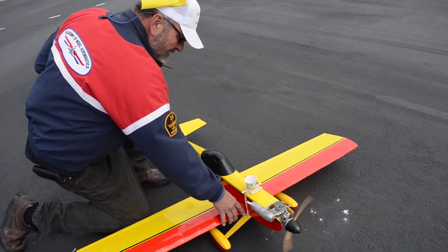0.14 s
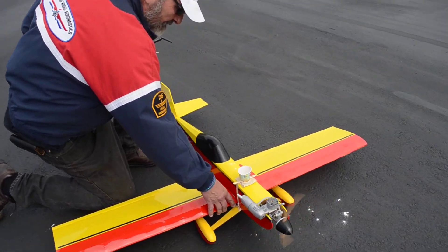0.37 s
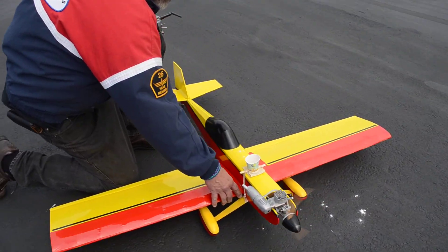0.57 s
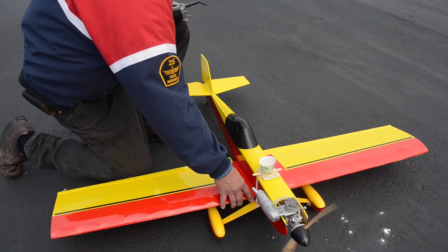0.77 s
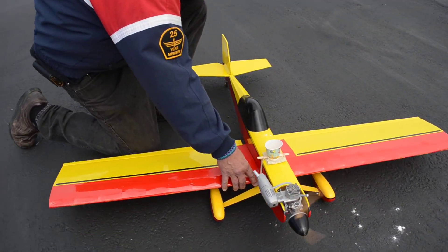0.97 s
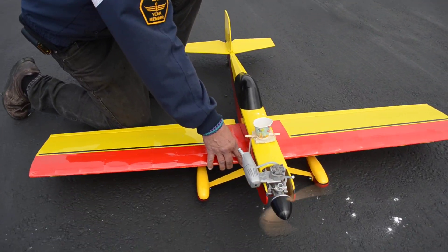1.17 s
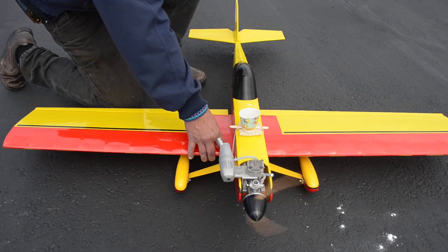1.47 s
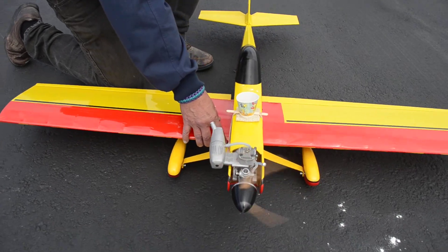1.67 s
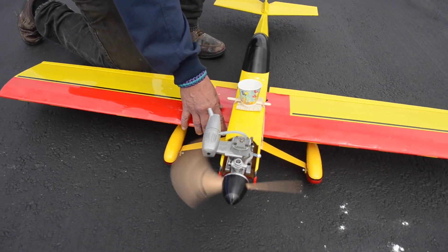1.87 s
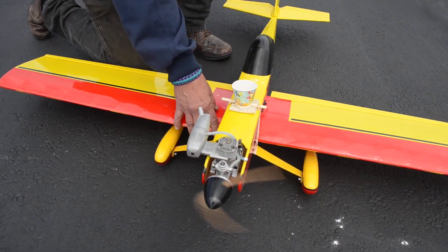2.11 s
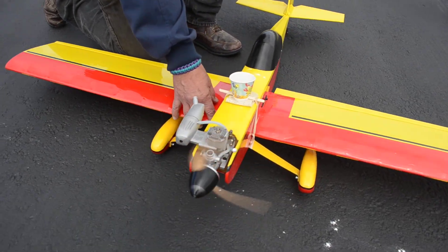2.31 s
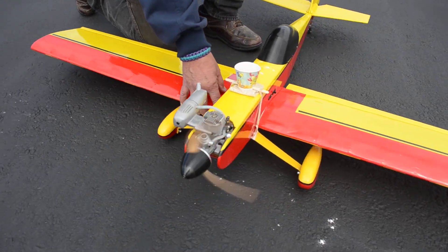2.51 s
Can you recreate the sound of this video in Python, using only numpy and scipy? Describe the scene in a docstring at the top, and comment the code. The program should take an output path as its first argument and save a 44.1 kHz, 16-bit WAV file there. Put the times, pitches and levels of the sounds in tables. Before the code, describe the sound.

A small single-cylinder model airplane engine putters at about 45 pops a second outdoors, close up. Until 0.8 s, propeller wash buffets the microphone with low rumble, thuds and slaps, half burying dull pops. From 1.0 s it speeds up, peaking near 1.2 s, with another gust and a crack around 1.3-1.4 s. By 1.8 s it settles into a clear, uneven idle with metallic knocks, propeller rush and faint hiss.

```python
"""A model airplane's single-cylinder engine idles on an airfield, picks up briefly and settles again.
At first the microphone is in the slipstream: shaped noise rumbles and buffets, with slaps, thuds and cracks.
Under it the exhaust pops once a turn, hard or faint, as short ringing sine bursts, and the metal knocks.
As the engine picks up, the microphone comes round to the nose: the pops, the knocks and the propeller's
rush of noise grow clear and bright. A soft intake hiss and a faint steady whine run throughout."""
import sys
import numpy as np
from scipy import signal
from scipy.fft import rfft, irfft
from scipy.io import wavfile
from scipy.ndimage import uniform_filter1d, minimum_filter1d

SR = 44100
rng = np.random.default_rng(int(sys.argv[2]) if len(sys.argv) > 2 else 0)


def wav_record(signal):
    """Record a signal, one row per channel, as 16-bit PCM in the file named by sys.argv[1]."""
    frames = np.transpose(np.atleast_2d(signal))
    bounded = np.clip(frames, -1, 1)
    # unit amplitude maps onto the largest positive 16-bit level
    quanta = np.round(bounded * 32767).astype(np.int16)
    wavfile.write(sys.argv[1], SR, quanta)


N = 116865
TIME = np.arange(N) / SR  # seconds

# Colour tables give only the shape of a noise's spectrum; the noise is then scaled to an rms of one.

# Crankshaft speed: time_s, speed_turns_per_s
SHAFT_SPEED = [(0.0, 44.56), (0.3, 43.04), (0.75, 41.91), (0.92, 44.51), (1.02, 49.27), (1.1, 63.05),
               (1.22, 75.11), (1.33, 64.9), (1.48, 61.16), (1.6, 51.78), (1.78, 46.26), (2.1, 45.26),
               (2.4, 47.05), (2.65, 48.97)]
# How far the microphone has come round from the side to the front: time_s, front_share (0 to 1)
FRONT_SHARE = [(.85, 0.2), (1.5, 0.94)]

# Low rumble of the wind, level: time_s, level_db
RUMBLE_LEVEL = [(0, -26), (.2, -29), (.6, -22.5), (.75, -31.5), (.9, -21.5), (1.04, -19.5), (1.13, -38),
                (1.23, -15), (1.31, -25.5), (1.5, -25), (1.65, -25.5), (1.77, -38), (1.87, -26),
                (1.95, -35), (2.65, -34.5)]
# Low rumble of the wind, colour: pitch_hz, level_db
RUMBLE_COLOUR = [(15, -38.5), (35, -19), (60, 2), (110, 2.5), (170, 0.5), (300, -17.5), (1000, -86.5)]
# Buffeting of the slipstream, level: time_s, level_db
BUFFET_LEVEL = [(0, -12.5), (.1, -17), (.22, -16), (.36, -16), (.5, -14.5), (.57, -15), (.598, -24.5),
                (.615, -15.5), (.69, -17), (.74, -21), (.8, -21.5), (.87, -25.5), (1.02, -34.5),
                (1.17, -23.5), (1.26, -27), (1.31, -19), (1.38, -18), (1.43, -25.5), (1.56, -28.5),
                (1.7, -33), (2.65, -33)]
# Buffeting of the slipstream, colour: pitch_hz, level_db
BUFFET_COLOUR = [(15, -38), (40, -23.5), (110, -6), (160, 0.5), (215, -0.5), (290, -4), (400, -2),
                 (600, -10), (900, -22.5), (1400, -52), (2500, -71.5), (6000, -78)]
# Rough upper edge of the buffeting, colour: pitch_hz, level_db
EDGE_COLOUR = [(200, -24), (500, 7.5), (900, -3.5), (1200, -4), (1450, -21), (1900, -21), (2500, -30.5),
               (3200, -34.5), (6000, -64.5)]
RUMBLE_LUMP_DB, BUFFET_LUMP_DB, EDGE_LUMP_DB = 1, 1.5, 4
EDGE_FOLLOW_DB = -9  # the rough edge against the buffeting

# Propeller rush, level: time_s, level_db
RUSH_LEVEL = [(0, -43.5), (.8, -54.5), (.95, -31), (1.1, -27.5), (1.22, -21.5), (1.33, -30), (1.6, -26.5),
              (1.8, -27.5), (2.2, -27.5), (2.65, -26.5)]
# Propeller rush, colour: pitch_hz, level_db
RUSH_COLOUR = [(40, 1), (100, -11.5), (200, 9.5), (280, -10), (450, 0.5), (700, 3.5), (1050, 3),
               (1500, -2.5), (2100, -17), (3000, -18), (6000, -63), (16000, -77)]
# Propeller hiss, level: time_s, level_db
HISS_LEVEL = [(0, -53), (.72, -59), (.88, -46.5), (1, -42.5), (1.13, -32), (1.22, -31), (1.29, -32.5),
              (1.32, -40.5), (1.42, -36.5), (1.65, -37.5), (1.85, -40), (2.3, -38.5), (2.65, -37)]
# Propeller hiss heard from the side, colour: pitch_hz, level_db
HISS_SIDE_COLOUR = [(700, -30.5), (1800, 10), (2900, -6), (3900, -1.5), (6000, -18.5), (12000, -18.5),
                    (16000, -34.5)]
# Propeller hiss heard from the front, colour: pitch_hz, level_db
HISS_FRONT_COLOUR = [(700, -6), (1800, 2.5), (2400, 1), (2650, -3), (2950, -1.5), (3250, -1.5), (3550, -8),
                     (3900, -4.5), (4200, -11), (5100, -14.5), (6000, -17.5), (7500, -19), (9000, -20.5),
                     (12000, -22), (14000, -33), (16000, -33)]
# Propeller hum: multiple_of_shaft_speed, level_against_the_rush_db
HUM_TONES = [(2, -7.5), (4, -6.5), (5, -13)]
SWISH_PHASE = 0.021  # part of a turn at which the rush peaks
RUSH_SWISH, HISS_SWISH = .3, .08  # swell in each turn, as a share of the level
RUSH_LUMP_DB, HISS_LUMP_DB = 1.0, 1.4

# Air drawn through the carburettor, level: time_s, level_db
INTAKE_LEVEL = [(0, -60), (.8, -60.5), (1.2, -50), (1.6, -47.5), (2.65, -43.5)]
# Air drawn through the carburettor, colour: pitch_hz, level_db
INTAKE_COLOUR = [(3000, -26.5), (4100, -23.5), (4450, 7.5), (4750, -16.5), (5100, 0.5), (5600, -17),
                 (8000, -36), (16000, -67.5)]
INTAKE_OPENS, INTAKE_RISE, INTAKE_FADE = .57, 0.048, 0.32  # in turns
WHINE_HZ, WHINE_DB = 15672, -82.5

# Ordinary pop, before the scatter and the ring's own level: time_s, level_db
POP_LEVEL = [(0, -26), (.8, -23), (.95, -18), (1.15, -13), (1.5, -15), (1.8, -14), (2.1, -12), (2.65, -12)]
# Hard firings: time_s, knock_db (before KNOCK_DB is added), pop_change_db
HARD_FIRINGS = [(.092, -52, 5), (.160, -56, 6), (.206, -43, -7), (.275, -47, 7), (.345, -49, 7),
                (.415, -52, -9), (.486, -53.5, 12), (.602, -47.5, -3), (.768, -49, -2), (.839, -47.5, 4.5),
                (.907, -43, 5), (.952, -44, 6), (.973, -45, 4), (.993, -42.5, 5), (1.034, -37, 5),
                (1.053, -39, 5), (1.088, -42, 3), (1.119, -42, 5.5), (1.149, -38, 4.5), (1.178, -40, 4.5),
                (1.205, -41, 5), (1.233, -42, 5), (1.289, -38, 10), (1.352, -55, 7), (1.396, -42, 3.5),
                (1.445, -41, 2), (1.493, -42, 3), (1.639, -52, 4), (1.659, -37.5, 4.5), (1.720, -38.5, 6),
                (1.807, -35, 5), (1.871, -43, -5), (1.893, -39.5, 3.5), (1.980, -36, 5.5),
                (2.046, -40, 0.5), (2.112, -50, 1), (2.134, -42, 0.5), (2.156, -40, 0.5), (2.199, -39, 1),
                (2.244, -34.5, 0.5), (2.286, -41.5, 2.5), (2.331, -38, 1.5), (2.436, -30.5, 4),
                (2.499, -38, 0.5), (2.520, -37.5, -1), (2.583, -39, 2), (2.602, -40.5, 1.5)]
# Misfires, whose pops are faint: time_s
MISFIRE_TIMES = [.883, 1.013, 1.134, 1.163, 1.247, 1.274, 1.319, 1.334, 1.365, 1.428, 1.460, 1.477, 1.562,
                 1.620, 1.679, 1.740, 1.784, 1.828, 2.002, 2.178, 2.265, 2.458, 2.479, 2.541, 2.622]
# Rings of the muffler: pitch_hz (before detuning), level_db, hold_s, decay_s, side_db
# (side_db counts times 1.5 minus the front share)
MUFFLER_RINGS = [(880, -3.5, .0025, .0002, 0), (997, -8, .0009, .0006, -2), (1111, -17, .0019, .0033, 3),
                 (1900, -21, .001, .0015, -16), (160, -26, .01, .005, 0)]
MISFIRE_DB, POP_SCATTER_DB = -13.5, .3
POP_DETUNE = .025  # typical random pitch change, as a share
POP_RISE_S, POP_LAG_S = .0003, .0008

# Sudden slaps of air on the microphone: start_s, level_db
SLAP_EVENTS = [(.001, -15.5), (.027, -16), (.052, -23.5), (0.086, -26), (0.114, -23), (.151, -16),
               (0.167, -20), (.190, -25.5), (0.203, -20.5), (.214, -16), (.233, -16), (.239, -17.5),
               (0.273, -23), (0.294, -19), (0.306, -19.5), (0.435, -14.5), (0.44, -16), (0.453, -14.5),
               (.474, -22), (0.481, -22), (0.494, -19), (0.511, -14.5), (0.522, -19.5), (0.535, -20),
               (0.609, -19), (0.689, -21), (0.71, -18), (1.286, -19), (1.296, -14.5), (1.314, -15),
               (1.35, -22), (1.374, -23), (1.392, -20)]
# Slap, colour: pitch_hz, level_db
SLAP_COLOUR = [(150, -24.5), (550, 2.5), (1000, 2.5), (1500, -9), (2100, -15.5), (3000, -36.5), (6000, -50),
               (16000, -76.5)]
SLAP_RISE_S, SLAP_HOLD_S, SLAP_FALL_S = .0006, .003, .0018

# Soft tick of an ordinary turn: time_s, level_db
TICK_LEVEL = [(0, -72.5), (.8, -67.5), (1.1, -47), (1.5, -66), (2.65, -55)]
# Knock heard from the side, colour: pitch_hz, level_db
KNOCK_SIDE_COLOUR = [(3000, -30), (6900, -25.5), (7400, -8), (7680, 7.5), (8000, -11), (8500, -30.5),
                     (11000, -14), (16000, -33)]
# Knock heard from the front, colour: pitch_hz, level_db
KNOCK_FRONT_COLOUR = [(3000, -12), (6000, -18), (6700, 0), (7100, -8.5), (7700, -4.5), (9200, -11),
                      (11500, -7.5), (16000, -31)]
# Rings of the engine's metal, scaled by the front share: pitch_hz, level_against_the_knock_db, decay_s
METAL_RINGS = [(6700, -12, .012), (10410, -20, .012)]
KNOCK_LAG_S, KNOCK_RISE_S, KNOCK_DECAY_S, KNOCK_DB = 0.0014, 0.00027, 0.0041, -3.5
SNAP_S, SNAP_DB = .0005, -5  # hold and decay of the snap; its level against the rattle

# Large eddies that thud on the microphone: middle_s, pitch_hz (halfway through the sag), level_db
EDDY_EVENTS = [(0.012, 230, -10.5), (0.044, 111, -16.5), (0.102, 194, -4), (0.166, 195, -9),
               (.203, 219, -8), (0.245, 196, -4.5), (.376, 353, -5.5), (0.483, 190, -17.5),
               (0.552, 400, -16), (.566, 226, -6.5), (.613, 447, -4.5), (0.628, 215, -8), (0.67, 384, -5.5),
               (0.71, 438, -2), (0.76, 430, -8.5), (.821, 336, -12.5), (.900, 95, -14.5), (1.033, 130, -24),
               (1.237, 95, -16), (1.275, 209, -6.5), (1.304, 343, -3.5), (1.339, 377, -7.5),
               (1.380, 190, -10.5), (1.464, 103, -14), (1.633, 85, -24), (1.848, 112, -25)]
EDDY_CYCLES = 4.16  # length of a thud
EDDY_SAG = 0.57  # whole fall in pitch, as a share of the middle pitch

# Sharp cracks of the microphone in the gusts, before softening: start_s, level_db
CRACK_EVENTS = [(.376, -26), (.454, -34), (.482, -28), (.565, -25), (0.612, -27), (0.712, -24),
                (1.307, -21), (1.4238, -8)]
CRACK_DECAY_S, CRACK_EDGE_HZ = 0.00044, 8900

CEILING = 0.7  # loudest sample value the limiter aims for
FADE_IN_S = .002
CUTOFF_HZ = 15900


def amp(db):
    """Turns decibels into a gain."""
    return 10 ** (np.asarray(db) / 20)


def unit(x):
    """Scales a sound to an rms of one."""
    return x / np.sqrt(np.mean(x ** 2) + 1e-20)


def curve(points, at=TIME):
    """Joins (time, value) points with straight lines and reads them."""
    return np.interp(at, *np.transpose(points))


def add(mix, s, sound):
    """Mixes a sound in at a time in seconds."""
    part = mix[max(round(s * SR), 0):][:len(sound)]
    part += sound[:len(part)]


def noise(colour):
    """Makes steady random noise with the spectrum of a colour table."""
    hz, db = np.transpose(colour)
    bins_hz = np.fft.rfftfreq(N, 1 / SR)
    gain = amp(np.interp(np.log(bins_hz + 1), np.log(hz), db))
    return unit(irfft(rfft(rng.standard_normal(N)) * gain, N))


def lumps(depth_db, rate_hz):
    """Turbulent air swells and fades at random: a gain drawn from slow noise."""
    bins_hz = np.fft.rfftfreq(N, 1 / SR)
    slow = irfft(rfft(rng.standard_normal(N)) * np.exp(-(bins_hz / rate_hz) ** 2), N)
    return unit(amp(depth_db * np.clip(unit(slow), -2, 2)))


def burst(t, rise_s, hold_s, decay_s):
    """An envelope that rises, holds and dies away; hold counts from the start."""
    return np.clip(t / rise_s, 0, 1) * np.exp(-np.maximum(t - hold_s, 0) / decay_s)


def turning(side, front, power):
    """Noise whose colour changes as the microphone comes round to the nose."""
    share = curve(FRONT_SHARE).clip(0, 1) ** power
    # square roots keep the total power steady
    return np.sqrt(1 - share) * noise(side) + np.sqrt(share) * noise(front)


def shaft():
    """Adds up the crankshaft's speed into turns, and finds when each turn begins."""
    turns = np.cumsum(curve(SHAFT_SPEED)) / SR
    firings = np.interp(np.arange(int(turns[-1]) + 1), turns, TIME)
    return turns, firings


def wind():
    """Slipstream and breeze beat on the microphone in lumpy gusts of low noise with a rough edge."""
    force = amp(curve(BUFFET_LEVEL))
    rumble = amp(curve(RUMBLE_LEVEL)) * noise(RUMBLE_COLOUR) * lumps(RUMBLE_LUMP_DB, rate_hz=4.8)
    buffet = force * noise(BUFFET_COLOUR) * lumps(BUFFET_LUMP_DB, rate_hz=86)
    edge = amp(EDGE_FOLLOW_DB) * force * noise(EDGE_COLOUR) * lumps(EDGE_LUMP_DB, rate_hz=300)
    return rumble + buffet + edge


def propeller(turns):
    """The blades churn the air: a rush and a hiss that swell once a turn, and a low hum."""
    swish = np.cos(2 * np.pi * (turns - SWISH_PHASE))
    rush = noise(RUSH_COLOUR) * (1 + RUSH_SWISH * swish) * lumps(RUSH_LUMP_DB, rate_hz=140)
    hiss = turning(HISS_SIDE_COLOUR, HISS_FRONT_COLOUR, power=0.98)
    hiss = hiss * (1 + HISS_SWISH * swish) * lumps(HISS_LUMP_DB, rate_hz=44)
    hum = np.zeros(N)
    for multiple, db in HUM_TONES:
        hum += amp(db) * np.sin(2 * np.pi * (round(multiple) * turns + rng.random()))
    return amp(curve(RUSH_LEVEL)) * (rush + hum) + amp(curve(HISS_LEVEL)) * hiss


def intake(turns):
    """Between pops the intake opens and sucks in air: a thin hiss that rises fast and fades."""
    since = (turns - INTAKE_OPENS) % 1  # turns since it last opened
    opening = np.minimum(since / INTAKE_RISE, 1) * np.exp(-since / INTAKE_FADE)
    return amp(curve(INTAKE_LEVEL)) * opening * noise(INTAKE_COLOUR)


def whine():
    """A faint, steady, very high sine tone."""
    return amp(WHINE_DB) * np.sin(2 * np.pi * WHINE_HZ * TIME)


def exhaust(firings):
    """Every turn sends a puff through the muffler: an abrupt bark of two cycles, then a thinner ring."""
    level = curve(POP_LEVEL, firings) + POP_SCATTER_DB * rng.standard_normal(len(firings))
    # each listed time belongs to the nearest firing
    for s, _, change_db in HARD_FIRINGS:
        level[np.argmin(abs(firings - s))] += change_db
    for s in MISFIRE_TIMES:
        level[np.argmin(abs(firings - s))] += MISFIRE_DB
    out, t = np.zeros(N), TIME[:SR // 30]
    for s, db, detune in zip(firings, level, rng.standard_normal(len(firings))):
        stretch = 1 + POP_DETUNE * detune
        side = 1.5 - curve(FRONT_SHARE, s)
        for hz, ring_db, hold_s, decay_s, side_db in MUFFLER_RINGS:
            ring = burst(t, POP_RISE_S, hold_s, decay_s) * np.sin(2 * np.pi * hz * stretch * t)
            add(out, s + POP_LAG_S, -amp(db + ring_db + side_db * side) * ring)
    return out


def slaps():
    """Sudden slaps of air press on the microphone: short bursts of noise."""
    force = np.zeros(N)
    for s, db in SLAP_EVENTS:
        force += amp(db) * burst(TIME - s, SLAP_RISE_S, SLAP_HOLD_S, SLAP_FALL_S)
    return force * noise(SLAP_COLOUR)


def knocks(firings):
    """The metal ticks on every turn and knocks on the hard firings: a snap, a rattle and a thin ring."""
    level = curve(TICK_LEVEL, firings)
    for s, db, _ in HARD_FIRINGS:
        level[np.argmin(abs(firings - s))] = db + KNOCK_DB
    strikes, rings, t = np.zeros(N), np.zeros(N), TIME[:SR // 10]
    rattle = burst(t, KNOCK_RISE_S, 0, KNOCK_DECAY_S)
    snap = amp(SNAP_DB) * burst(t, KNOCK_RISE_S, SNAP_S, SNAP_S)
    for s, db in zip(firings, level):
        add(strikes, s + KNOCK_LAG_S, amp(db) * (rattle + snap))
        for hz, ring_db, decay_s in METAL_RINGS:
            ring = np.exp(-t / decay_s) * np.sin(2 * np.pi * hz * t)
            add(rings, s + KNOCK_LAG_S, curve(FRONT_SHARE, s) * amp(db + ring_db) * ring)
    return strikes * turning(KNOCK_SIDE_COLOUR, KNOCK_FRONT_COLOUR, power=1.7) + rings


def eddies():
    """Each large eddy that hits the microphone gives a short low thud whose pitch sags."""
    out = np.zeros(N)
    for (s, hz, db), phase in zip(EDDY_EVENTS, rng.random(len(EDDY_EVENTS))):
        length_s = EDDY_CYCLES / hz
        u = np.arange(0, length_s, 1 / SR) / length_s  # 0 to 1 through the thud
        cycles = EDDY_CYCLES * (u + EDDY_SAG * u * (1 - u) / 2)
        swell = np.sin(np.pi * u) ** 2
        add(out, s - length_s / 2, amp(db) * swell * np.sin(2 * np.pi * (cycles + phase)))
    return out


def cracks():
    """Sudden steps of pressure at the microphone that die at once, softened by a low-pass filter."""
    out, t = np.zeros(N), TIME[:SR // 20]
    for s, db in CRACK_EVENTS:
        add(out, s, -amp(db) * np.exp(-t / CRACK_DECAY_S))
    pole = np.exp(-2 * np.pi * CRACK_EDGE_HZ / SR)
    return signal.lfilter([1 - pole], [1, -pole], out)


def scene():
    """Adds wind, propeller and engine at one microphone, with the faint high whine."""
    turns, firings = shaft()
    air = wind() + propeller(turns) + slaps() + eddies() + cracks()
    engine = intake(turns) + exhaust(firings) + knocks(firings)
    return (air + engine + whine())[None]


def record(dry):
    """A quick limiter holds the loudest peaks down; then a short fade-in and the treble limit."""
    room = np.minimum(1, CEILING / (abs(dry[0]) + 1e-9))
    # hold each dip in gain, then smooth it twice so that it does not click
    gain = minimum_filter1d(room, size=300)
    gain = uniform_filter1d(uniform_filter1d(gain, size=150), size=150)
    gain = gain * np.minimum(TIME / FADE_IN_S, 1)
    low_pass = signal.firwin(511, CUTOFF_HZ, window=("kaiser", 9), fs=SR)
    return signal.oaconvolve(dry * gain, low_pass[None], "same")


dry = scene()
out = record(dry)
wav_record(out)
```